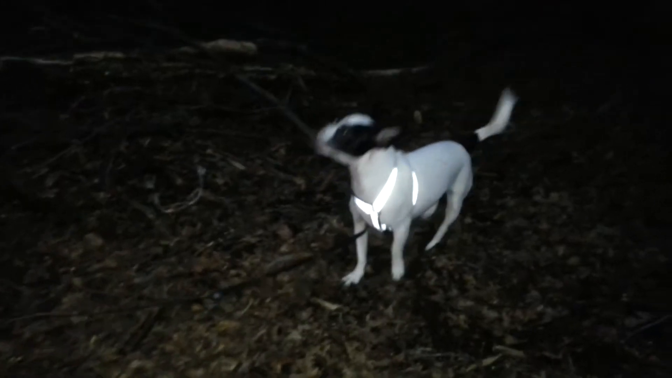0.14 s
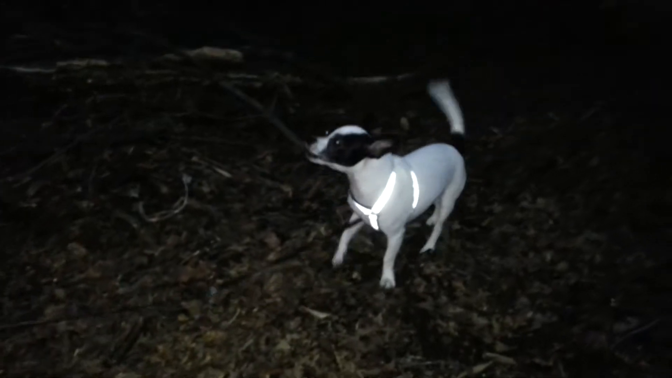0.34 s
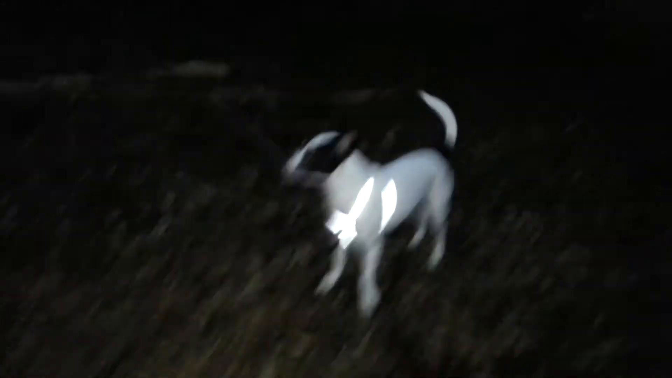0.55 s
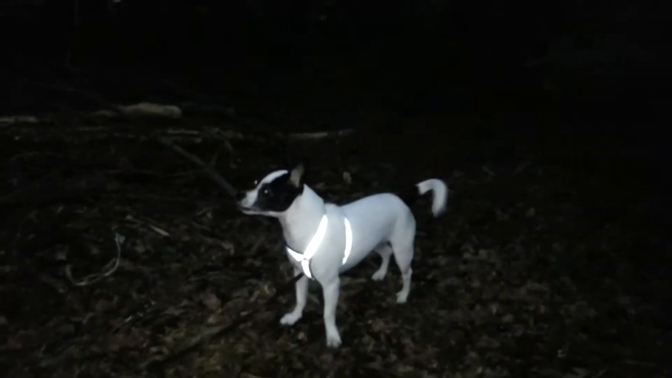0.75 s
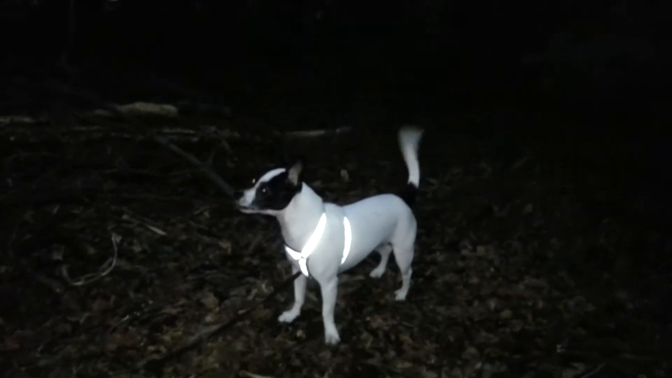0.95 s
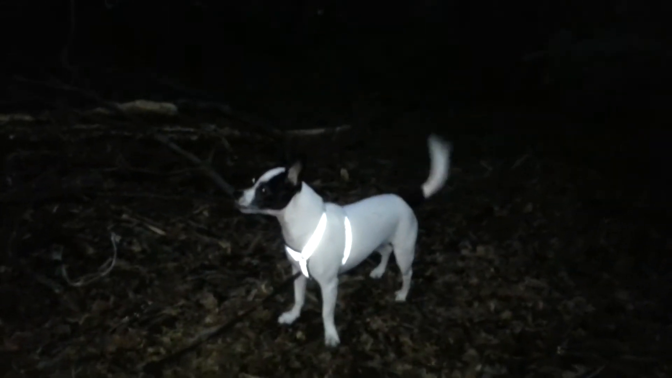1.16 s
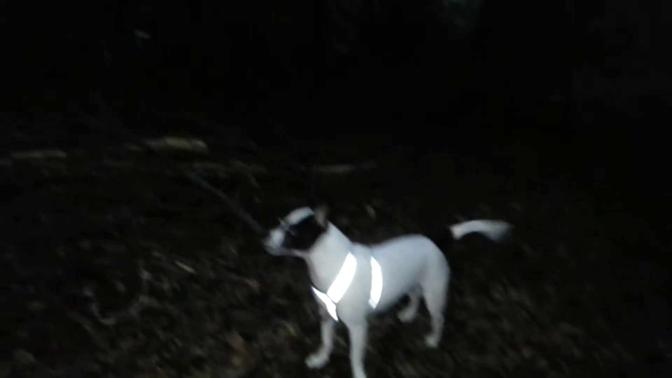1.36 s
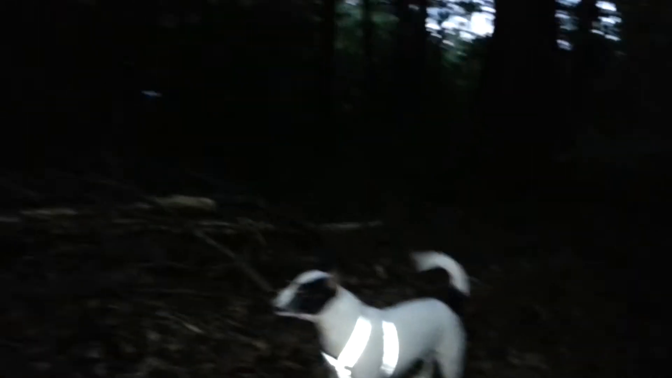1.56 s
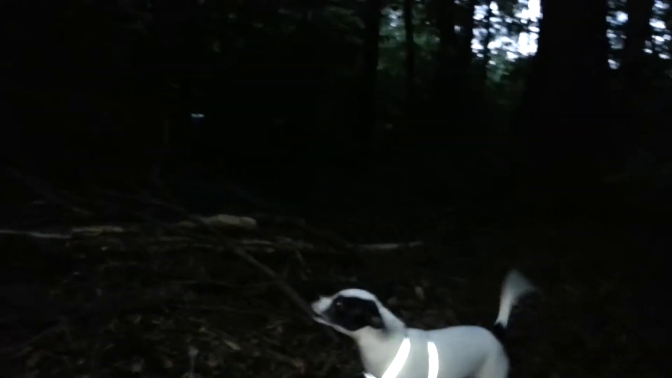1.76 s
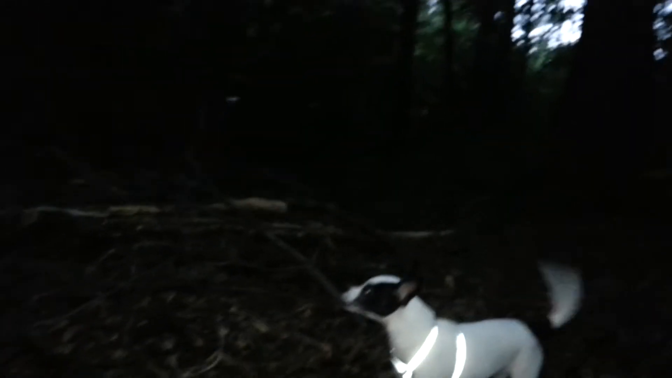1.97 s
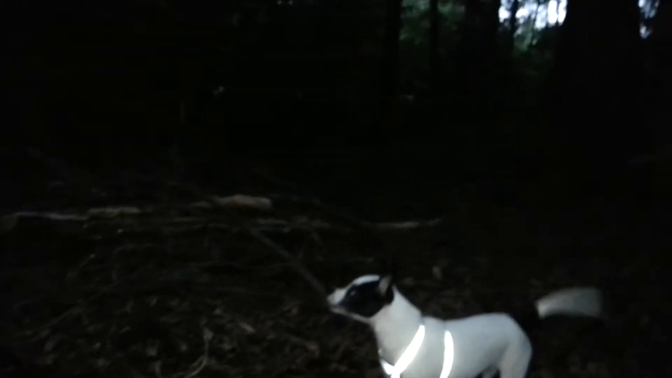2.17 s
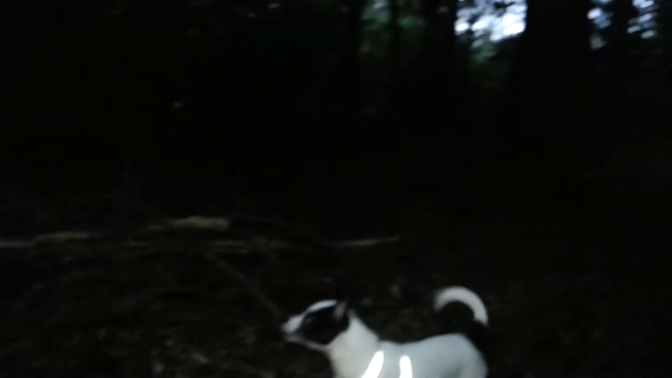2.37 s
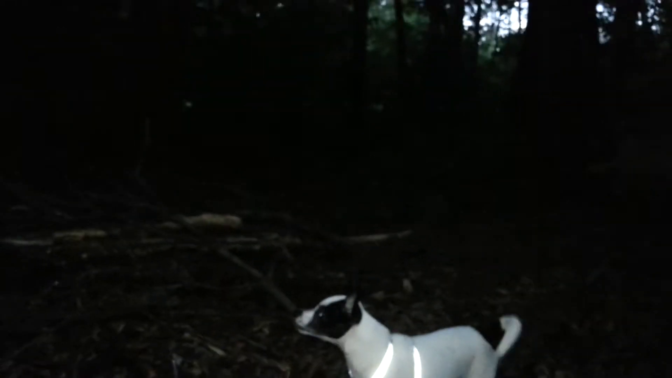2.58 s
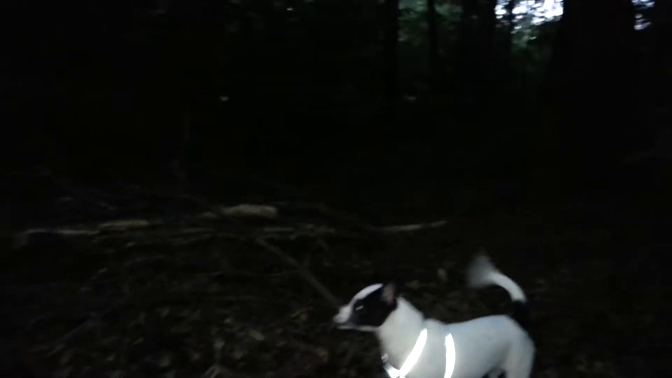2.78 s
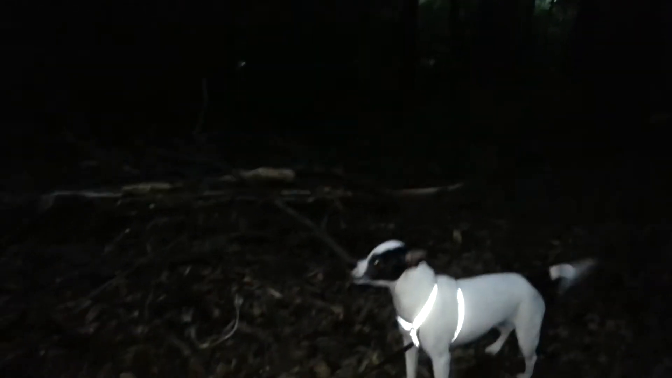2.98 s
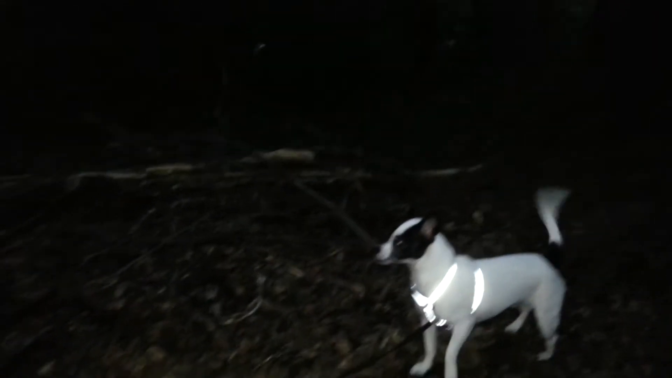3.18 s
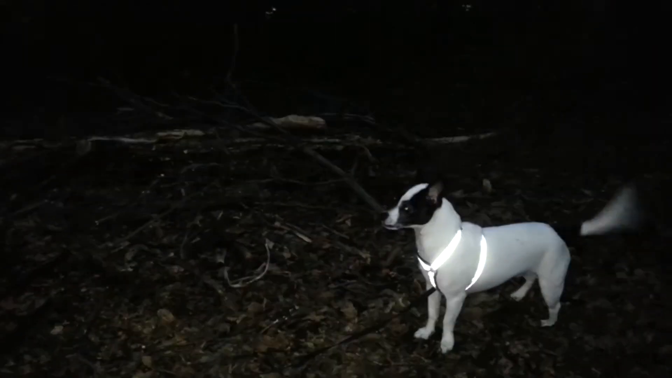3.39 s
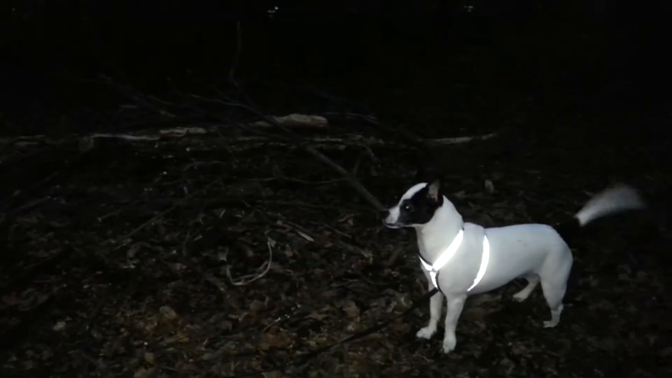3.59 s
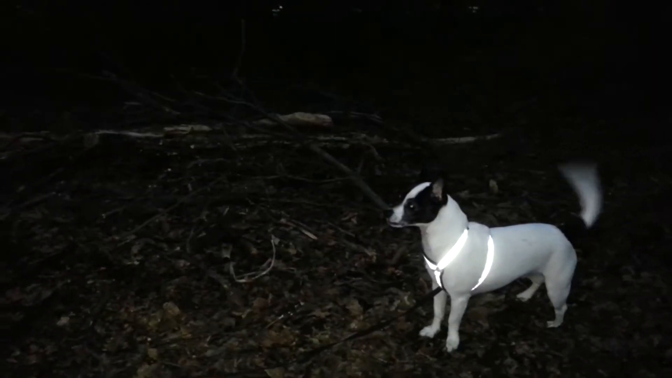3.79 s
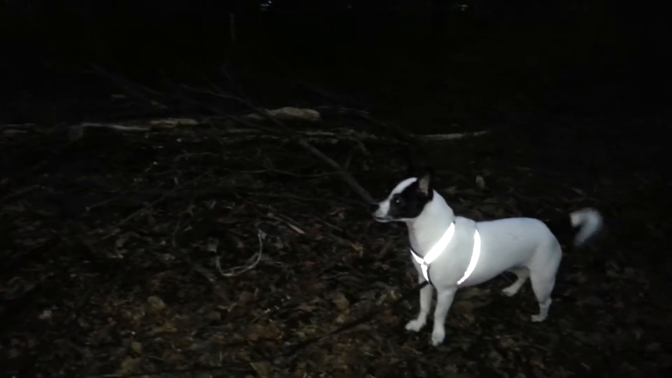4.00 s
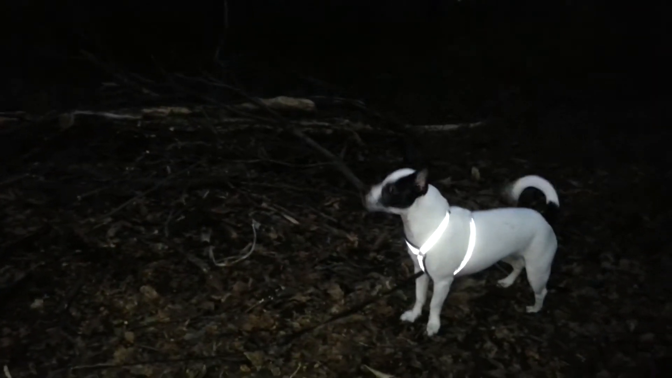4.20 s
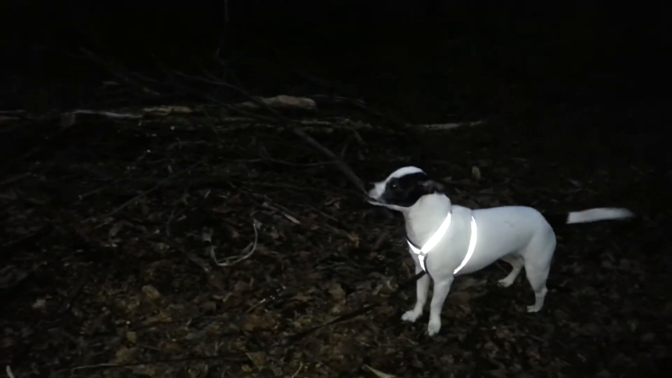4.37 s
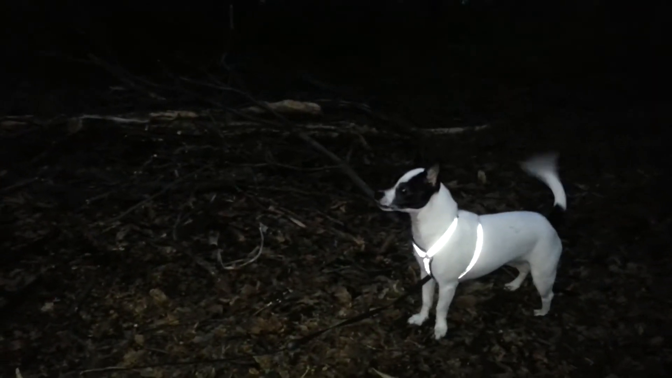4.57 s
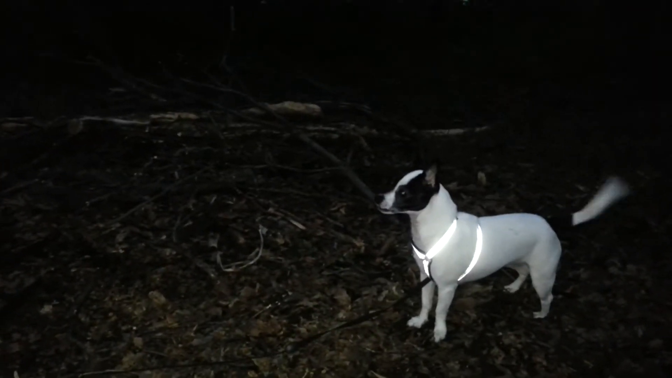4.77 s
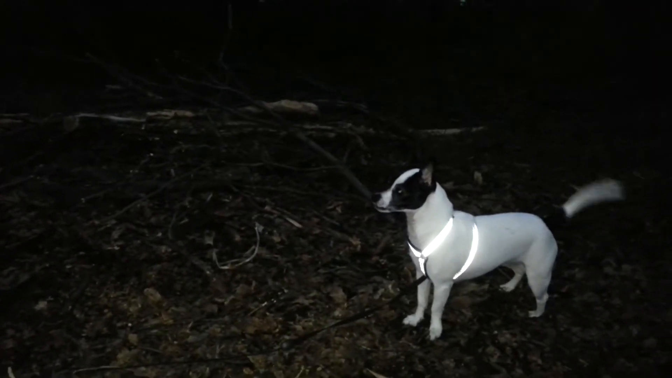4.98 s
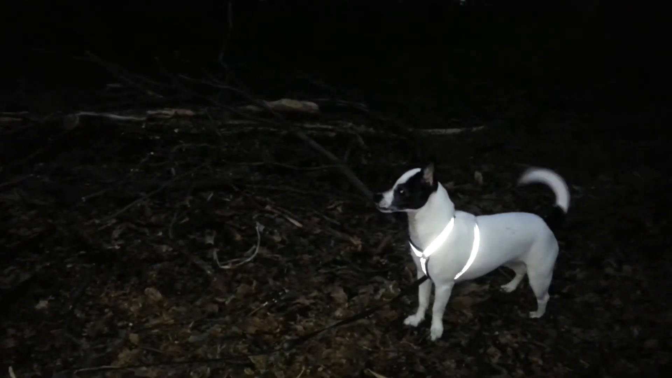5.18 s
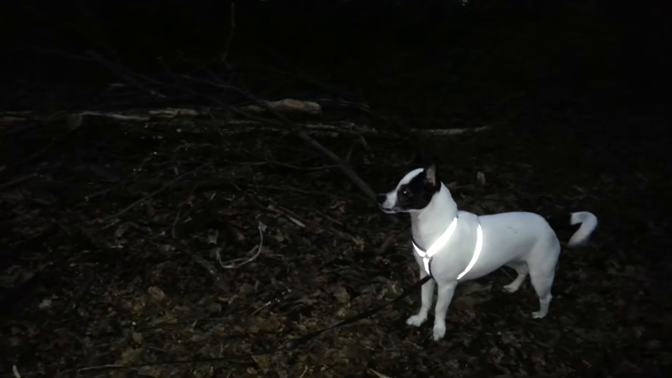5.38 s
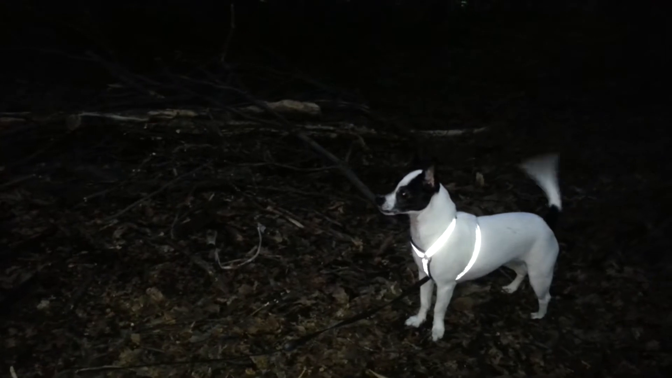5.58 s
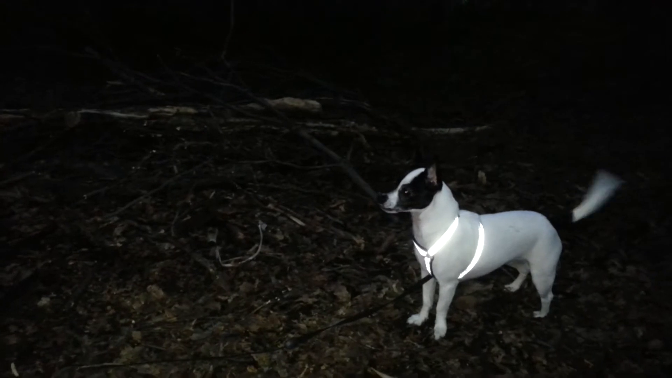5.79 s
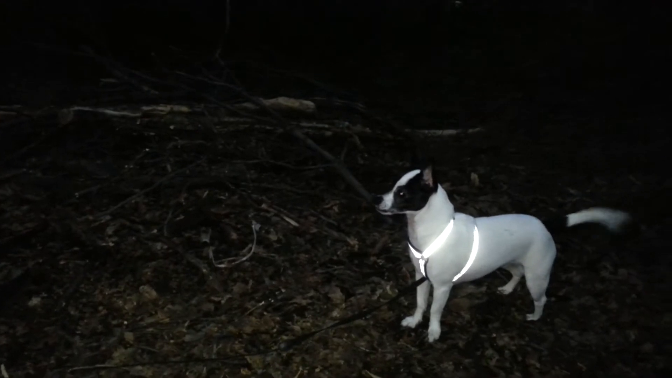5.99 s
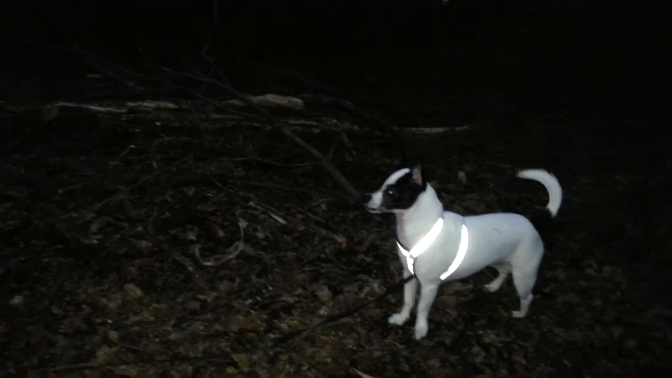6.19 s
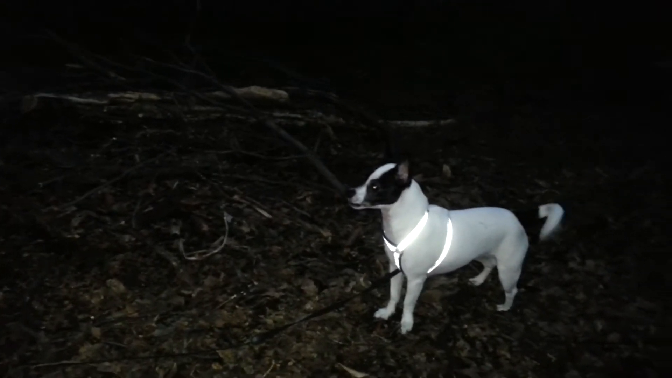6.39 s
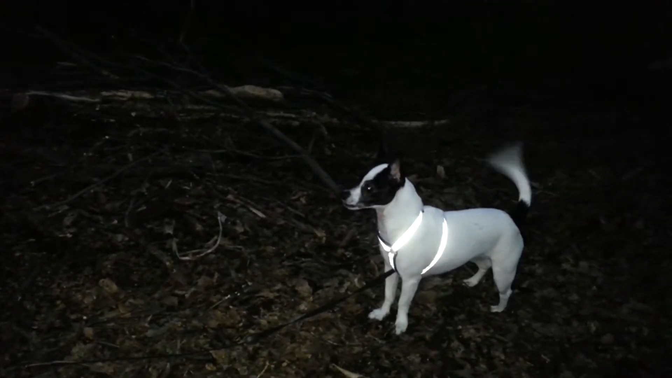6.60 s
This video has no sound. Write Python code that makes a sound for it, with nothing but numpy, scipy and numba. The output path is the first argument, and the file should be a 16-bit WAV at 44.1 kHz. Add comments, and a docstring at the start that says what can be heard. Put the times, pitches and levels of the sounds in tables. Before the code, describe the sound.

A small dog growls close by in quiet woods at night, in quick fluttering throbs that flare into a brief snarl at about 0.4 seconds and fade by 1.5. At 1.6 seconds it gives a loud, sharp, rough bark. A softer, lower bark comes at 3 seconds, followed by quieter broken growling, then another loud bark at 4.2. The two loud barks slightly overload the microphone and ring on among the trees. A distant dog answers with faint, echoing yelps, clearest around 3.7, 6.3 and 6.5 seconds. Drips tick irregularly on dry leaves throughout, with the sharpest one a little to the left at about 6.2 seconds. Leaves rustle softly near the start and again around 3 seconds. Underneath, the night air makes a faint, steady hiss.

```python
"""In a wood at night, a small dog close by growls in fluttering throbs and barks three times.
Its vocal folds chop the breath into pulses, which ring in its mouth or hum through its nose.
The two loud barks overload the microphones and ring on among the trunks.
Another dog answers far away, drips tick on dry leaves, the leaves rustle and the air hisses faintly."""
import sys
import numpy as np
from scipy import signal
from scipy.fft import rfft, irfft, next_fast_len
from scipy.io import wavfile
from scipy.ndimage import uniform_filter1d
from numba import njit

SR = 44100
rng = np.random.default_rng(int(sys.argv[2]) if len(sys.argv) > 2 else 0)


def dump(signal):
    """Clip the signal to [-1, 1] and save it as 16-bit WAV at the path in sys.argv[1]."""
    limited = np.clip(np.atleast_2d(signal).T, -1, 1)
    pcm = np.round(limited * 32767).astype(np.int16)
    wavfile.write(sys.argv[1], SR, pcm)


N = 293265

# The three barks. Each row: start in seconds, seconds until the voice breaks and until the mouth closes,
# clean and broken pitch in Hz, ring of the open jaw in Hz, ring of the tongue before and after the
# break in Hz, extra push at the break in dB, loudest chest hum in dB.
BARKS = [(1.597, .047, .154, 308.4, 468, 920.6, 1549, 1539, 4.5, -46),
         (2.953, .056, .092, 183.4, 232.4, 808, 1289, 1498, 0, -38.5),
         (4.207, .058, .114, 264, 397.7, 764, 1472, 1543, 5, -46)]
# How each bark swells and fades, one list per bark.
# Each row: time in seconds, level of the jaw's ring in dB, level of the higher rings in dB.
BARK_LEVELS = [
    [(1.597, -23, -38), (1.603, -16, -16.5), (1.619, -2.5, -9), (1.687, -7.5, -3.5), (1.695, -0.5, -11.5),
     (1.727, -10.5, -7.5), (1.751, -5.5, -20), (1.765, -20, -25), (1.795, -24, -25.5)],
    [(2.952, -30, -49.5), (2.958, -21, -35.5), (2.966, -18.5, -30), (2.982, -23.5, -24),
     (3.002, -13.5, -14.5), (3.01, -19.5, -30.5), (3.036, -23.5, -33.5), (3.065, -42.5, -50.5)],
    [(4.207, -29.5, -54.5), (4.233, -6.5, -19), (4.249, -3, -12), (4.281, -11.5, -8.5), (4.301, -10.5, -4),
     (4.321, -10.5, -24.5), (4.329, -13.5, -31.5), (4.345, -31, -35.5)],
]

def barks(break_blend_s=.0033, push_s=.028, hum_s=.085, release_db_per_s=598.5,
          half_open_hz=690, closing_hz_per_s=450, clean_rough=.087, hoarse_rough=.4, broken_rough=.76):
    """The vocal folds beat cleanly, break into chaos at full effort, and run down in a low hum."""
    out = np.zeros(N)
    for bark, levels in zip(BARKS, BARK_LEVELS):
        start, break_s, close_s, clean_hz, broken_hz = bark[:5]
        open_hz, tongue_from_hz, tongue_to_hz, push_db, chest_db = bark[5:]
        age = np.arange(int((close_s + hum_s) * SR)) / SR
        since_break = age - break_s
        broken = (1 + np.tanh(since_break / break_blend_s)) / 2  # 0 before the break, 1 after
        effort_db = push_db * np.exp(-(since_break / push_s) ** 2)
        release_db = release_db_per_s * np.maximum(start + age - levels[-1][0], 0)
        jaw_db, upper_db = curves(levels, start + age) + (effort_db - release_db)
        voice_db = np.maximum(jaw_db, upper_db)
        pitch = bark_pitch(age, break_s, close_s, clean_hz, broken_hz, broken)
        # roughness runs from 0 to 1; the broken voice is roughest where it is brightest
        chaos = broken * np.interp(upper_db - jaw_db, [-12, 0], [broken_rough / 2, broken_rough])
        hoarse = hoarse_rough * (voice_db < -9)  # pushed too softly to beat cleanly
        rough = np.maximum(chaos, hoarse) * (age < close_s)
        flow = vocal_folds(pitch, np.maximum(rough, clean_rough))
        # the mouth opens wide as the voice breaks
        jaw_hz = half_open_hz + (open_hz - half_open_hz - closing_hz_per_s * since_break) * broken
        tongue_hz = tongue_from_hz + (tongue_to_hz - tongue_from_hz) * broken
        jaw, upper = mouth(flow, jaw_hz, tongue_hz, damping=.85)
        voice = amp(jaw_db) * levelled(jaw, span_s=.006)
        voice += amp(upper_db - 1) * levelled(upper, span_s=.0075)
        # the chest gives off the lowest tone, even as the mouth closes
        hum = cut_bass(resonate(np.diff(flow, prepend=0), pitch, width_hz=110.), hz=130, order=4)
        chest = amp(np.minimum(chest_db, voice_db - 9)) * levelled(hum, span_s=.013)
        add(out, start, (voice + chest + breath(age, voice_db)) * signal.windows.tukey(len(age), .03))
    return out


def bark_pitch(age, break_s, close_s, clean_hz, broken_hz, broken,
               scoop=.2, scoop_s=.009, climb_hz_per_s=1620, sag_hz_per_s=420, run_down_s=.07):
    """The pitch slides in from below, climbs until the break, sags, and drops once the mouth closes."""
    climbing = (clean_hz + climb_hz_per_s * age) * (1 - scoop * np.exp(-age / scoop_s))
    sagging = broken_hz - sag_hz_per_s * (age - break_s)
    run_down = np.exp(-np.maximum(age - close_s, 0) / run_down_s)
    return ((1 - broken) * climbing + broken * sagging) * run_down


def vocal_folds(pitch, rough, jitter=.2, scatter_db=5):
    """Each beat of the folds lets out a pulse and a puff of air; a rough voice beats unevenly."""
    n, cycles = len(pitch), np.cumsum(pitch) / SR
    beats = np.flatnonzero(np.diff(np.floor(cycles), prepend=-1))
    late, size = rng.standard_normal((len(beats), 2)).T
    at = np.clip(beats + jitter * rough[beats] * late * SR / pitch[beats], 0, n - 1).astype(int)
    pulses = np.bincount(at, amp(scatter_db * rough[beats] * size), n)
    puffs = unit(rng.standard_normal(n) * (1 + np.cos(2 * np.pi * cycles)))
    return unit(pulses) + rough * puffs


# The mouth's four rings (resonances), low to high. Each row: width in Hz before damping, level in dB.
MOUTH_RINGS = [(213, 4), (300, -4.5), (246.2, -10.5), (450, -39.5)]

def mouth(flow, jaw_hz, tongue_hz, damping):
    """Air rings in the open mouth. Returns the jaw's ring and the sum of the three higher ones."""
    centres = [jaw_hz, tongue_hz, 1.46 * tongue_hz, np.full(len(flow), 4100.)]
    jaw, *upper = [amp(db) * resonate(flow, hz, width * damping)
                   for hz, (width, db) in zip(centres, MOUTH_RINGS)]
    return cut_bass([jaw, sum(upper)], hz=230, order=2)  # a small mouth gives off no bass


# The tone of a bark's breath. Each row: frequency in Hz, level in dB.
BREATH_TONE = [(2000, -20.5), (3200, -7.5), (4300, 0), (6500, -1.5), (8500, 1), (12000, -9.5),
               (15000, -19.5)]

def breath(age, voice_db, lag_s=.012, below_voice_db=28, limit_db=-49):
    """Air rushes past the teeth, trailing the voice a little."""
    rush_db = np.minimum(limit_db, np.interp(age - lag_s, age, voice_db) - below_voice_db)
    return amp(rush_db) * unit(coloured(rng.standard_normal(len(age)), BREATH_TONE))


# How hard the dog growls. Each row: time in seconds, pulses per second, level through the nose in dB.
GROWL_EFFORT = [(0, 158.4, -23.5), (.07, 174, -16.5), (.29, 117.7, -27), (.39, 174.5, -15.5),
                (.55, 145.3, -21), (.7, 138.9, -25.5), (1.35, 137.4, -28.5), (1.52, 115.7, -31),
                (3.1, 91.6, -41.5), (3.25, 100.3, -34.5), (3.52, 116.2, -33.5), (3.83, 114.8, -32.5),
                (4.12, 107, -34)]
# The opening snarl. Each row: time in seconds, level through the lips in dB, ring of the jaw in Hz.
SNARL = [(0, -20, 735), (.14, -26.5, 710), (.27, -26, 665), (.345, -15, 660), (.372, -14.5, 678.7),
         (.388, -7, 706), (.407, -20, 698), (.44, -21.5, 690), (.48, -57.5, 700)]
# The tone of the closed muzzle. Each row: frequency in Hz, level in dB.
NOSE_TONE = [(60, -52), (105, -20.5), (140, -9), (280, -1.5), (350, -1), (425, 6.5), (490, 2), (560, -0.5),
             (720, 2), (850, 4.5), (1080, 4), (1260, -26), (1500, -21), (2500, -37), (5000, -78.5)]

def growl(scatter_db=1, jitter_s=.00019, sag_db=3, rasp=.44):
    """Slow pulses come in throbs, through bared lips and nose at first, then through the nose."""
    nose, lips = np.zeros(N), np.zeros(N)
    for start, length in throbs():
        rate = curves(GROWL_EFFORT, start)[0]
        beat = np.arange(max(round(length * rate), 1))
        late, size = rng.standard_normal((len(beat), 2)).T
        times = start + beat / rate + jitter_s * late
        nose_db, lips_db = curves(GROWL_EFFORT, times)[1], curves(SNARL, times)[0]
        at = np.clip(times * SR, 0, N - 1).astype(int)
        # behind a closed mouth the folds need one beat to get going
        soft_start_db = -3 * (beat == 0) * (len(beat) > 2)
        nose[at] = amp(nose_db + scatter_db * size + soft_start_db)
        # an open mouth lets the pressure sag
        lips[at] = amp(lips_db + scatter_db * size - sag_db * np.minimum(beat, 2))
    # each pulse drags a little rushing air with it
    nose += rasp * np.sqrt(np.abs(uniform_filter1d(nose ** 2, size=300))) * rng.standard_normal(N)
    jaw_hz = curves(SNARL, np.arange(N) / SR)[1]
    through_lips = lambda x, hz: amp([0, -9]) @ mouth(x, hz, 1.85 * hz, damping=.55)
    pulse = signal.unit_impulse(SR // 10, 'mid')  # one pulse sets the scale of both paths
    snarl = through_lips(lips, jaw_hz) / through_lips(pulse, jaw_hz[:len(pulse)]).max()
    muffled = coloured(nose, NOSE_TONE) / coloured(pulse, NOSE_TONE).max()
    return amp(3) * snarl - muffled


# Bouts of growling. Each row: start in seconds, number of throbs, throbs per second,
# share of each throb that sounds.
GROWL_BOUTS = [(-.001, 10, 29, .55), (.341, 1, 29, .65), (.369, 2, 24, .9), (.457, 7, 22.8, .58),
               (.760, 7, 24.3, .62), (1.044, 8, 23.1, .65), (1.390, 4, 25.3, .48), (3.155, 2, 13.7, .78),
               (3.305, 3, 21.5, .62), (3.502, 3, 9.6, .9), (3.817, 4, 25.6, .55), (3.978, 5, 28.4, .25)]

def throbs():
    """Each bout flutters at its own steady rate. Returns every throb's start and length in seconds."""
    return [(start + k / rate, share / rate)
            for start, count, rate, share in GROWL_BOUTS for k in range(round(count))]


# The far dog's yelps. Each row: start in seconds, length in seconds, pitch in Hz, level in dB,
# step in dB from one harmonic (a multiple of the pitch) to the next.
FAR_YELPS = [(3.415, 0.13, 610, -65.5, 4.5), (3.626, 0.072, 491, -57.5, 1), (3.672, .12, 555, -39, -15.5),
             (4.454, .083, 584.4, -57, -14), (5.44, 0.11, 450, -55.5, -20), (5.666, 0.14, 588.6, -55, -4.5),
             (6.268, 0.029, 481, -50.5, -1.5), (6.295, .1, 558.8, -42.5, -11.5),
             (6.501, 0.091, 575, -48.5, -8)]

def far_dog(scoop=.055, scoop_share=.22, waver=.035):
    """Each hoarse yelp slides up to its pitch; distance leaves only three harmonics."""
    out = np.zeros(N)
    for start, length, hz, db, step_db in FAR_YELPS:
        progress = np.linspace(0, 1, int(length * SR))
        unsteady = 1 + waver * np.interp(progress, np.linspace(0, 1, 20), rng.standard_normal(20))
        pitch = hz * (1 - scoop * np.exp(-(progress / scoop_share) ** 2)) * unsteady
        phase = 2 * np.pi * np.cumsum(pitch) / SR
        tone = sum(amp(db + k * step_db) * np.sin((k + 1) * phase) for k in range(3))
        add(out, start, tone * signal.windows.tukey(len(tone), .6))
    return out


# The heavier drips. Each row: time in seconds, level in dB, share of leaf body in dB (capped at 0),
# lean to the left (negative is right).
HEAVY_DRIPS = [(0.1055, -31.5, -23, 1.0), (0.4697, -29, -23, -0.5), (0.5322, -16, -17, 4),
               (0.6134, -30, 26, 2.5), (0.7506, -37, -15, -0.5), (1.2825, -39, -0.5, 1.0),
               (1.3181, -23.5, -17, 1), (1.925, -26.5, -12, 3.5), (2.9231, -36, -21, -6),
               (3.1712, -19, -19.5, -1.5), (3.2151, -30, -21, -1), (3.3277, -31.5, -16.5, -0.5),
               (3.5018, -33.5, -16, 2), (3.5326, -33, -18.5, -1), (4.8752, -29, -20.5, -2.5),
               (4.9585, -26, -9.5, 1), (5.6065, -17, -14.5, 0), (5.671, -31, -31.5, 1.5),
               (5.7581, -25.5, -5, 2.5), (5.8027, -30, 4.5, 3), (5.9504, -26, -5.5, 0.5),
               (6.128, -28.5, -19.5, -2), (6.2163, -1.5, -13, 7)]
# The tones of a drip's leafy body, sharp edge and low thud. Each row: frequency in Hz, level in dB.
LEAF_TONE = [(100, -60), (600, -35), (1200, -13.5), (1700, 1.5), (2300, 3), (3000, -10), (4200, 0.5),
             (5200, -13), (9000, -37)]
SNAP_TONE = [(100, -59.5), (1500, -31.5), (3500, -7), (5800, -7.5), (8000, -5), (11000, -4.5),
             (14000, -7.5), (16000, -23.5)]
THUD_TONE = [(90, -58), (240, -14.5), (500, 0.5), (1000, -11), (2000, -24.5), (5000, -61)]

def drips(crack_s=.0015, crack_top_hz=14200, grit_s=.0033, rattle_s=.05, left_lag_s=.00036, spread=.24):
    """Each drip cracks on a leaf, which rattles briefly; heavy ones thud. The right side hears it first."""
    out, t = np.zeros((2, N)), np.arange(SR // 20) / SR
    remaining = np.clip(1 - t / crack_s, 0, 1)
    crack = np.sin(np.pi * crack_top_hz * crack_s * remaining ** 2)  # crosses the leaf treble first
    fade = amp(-1 - 60 * t / grit_s) + amp(-16 - 60 * t / rattle_s)
    for time, db, body_db, lean in [*HEAVY_DRIPS, *light_drips()]:
        burst = np.pad(crack + rng.standard_normal(len(t)) * fade, (64, 0))
        body = amp(9.5 + min(body_db, 0)) * coloured(burst, LEAF_TONE)
        thud = amp(db / 2 - 7) * coloured(burst, THUD_TONE)
        tick = coloured(burst, SNAP_TONE) + body + thud
        tick *= amp(db + 2) / np.abs(tick).max()
        start = time - .0005
        add(out[0], start + left_lag_s, tick * amp(spread * lean))
        add(out[1], start, tick * amp(-spread * lean))
    return out


def light_drips(per_s=1.5, level_db=-42, range_db=10, body_db=-11):
    """Light drips fall at random moments. Returns rows like those of the heavier ones."""
    draws = rng.random((round(per_s * N / SR), 2))
    return [(when * N / SR, level_db + range_db * (size - .5), body_db, 0) for when, size in draws]


# How long the wood rings. Each row: frequency in Hz, seconds to fade by 60 dB.
ECHO_FADE = [(150, .5), (500, 0.36), (1000, 1.8), (2200, 1.1), (4000, .6), (10000, 0.72)]
# The tone of the echo. Each row: frequency in Hz, level in dB.
ECHO_TONE = [(100, -13), (450, -15.5), (800, -9.5), (1150, 1), (1550, -9.5), (1950, -1), (2400, -2.5),
             (4000, 10), (12000, 4)]

def wood_echo(x, near_db=3, near_fade_s=.61, rise_s=.0029, width=.44):
    """Near trunks scatter a quick answer, far ones a long tail."""
    hz, t, noise = signal.stft(rng.standard_normal((2, SR * 3 // 2)), SR, nperseg=256)
    fade = amp(-60 * t / along(ECHO_FADE, hz)[:, None]) + amp(near_db - 60 * t / near_fade_s)
    rise = 1 - np.exp(-t / rise_s)
    mid, side = signal.istft(noise * fade * rise, SR, nperseg=256)[1]
    tail = np.array([mid + width * side, mid - width * side])
    tail = coloured(tail / np.linalg.norm(tail[0]), ECHO_TONE)
    return signal.fftconvolve(x[None], tail, axes=1)[:, :N]


# Scuffs in the leaves. Each row: time in seconds, level in dB.
SCUFFS = [(0, -46), (.5, -50.5), (1.302, -55.5), (3.05, -53), (3.5, -57.5)]
# The tone of dry leaves. Each row: frequency in Hz, level in dB.
RUSTLE_TONE = [(1000, -13), (2200, 4), (4500, -2.5), (6500, -4.5), (8500, -5), (13000, -10), (15500, -18.5)]

def rustle(crackles_per_s=1200, crackle_s=.0011, scatter_db=3, rise_s=.049, settle_db_per_s=16):
    """Dry leaves crackle at each scuff, then settle."""
    t = np.arange(N) / SR
    swells = [amp(db - settle_db_per_s * np.maximum(t - s, 0)) * np.clip(1 + (t - s) / rise_s, 0, 1)
              for s, db in SCUFFS]
    hits = rng.random(N) < crackles_per_s / SR
    sizes = amp(scatter_db * np.minimum(rng.exponential(size=N), 4))
    crackles = signal.lfilter([1], [1, -np.exp(-1 / (crackle_s * SR))], hits * sizes)
    return np.max(swells, axis=0) * unit(coloured(crackles * rng.standard_normal((2, N)), RUSTLE_TONE))


# The tone of the night air. Each row: frequency in Hz, level in dB.
AIR_TONE = [(25, -38), (60, -25), (110, -10), (200, -12), (420, -6), (700, -7.5), (1100, -11.5),
            (1700, -18.5), (2400, -13), (3400, -21.5), (4200, -16), (6200, -24), (9000, -23),
            (14000, -25.5), (15600, -43)]
# How alike left and right are. Each row: frequency in Hz, likeness (1 is the same, 0 or less unrelated).
AIR_LIKENESS = [(60, 0.62), (180, 0.093), (550, 0.016), (1650, -0.095), (4970, -0.47), (15000, -0.14)]

def night_air(level_db=-53, hiss_hz=4800, hiss_half_width_hz=300, hiss_db=-61):
    """The air makes a faint, wide hush, with a narrow band of high hiss."""
    def mid_and_side(hz):
        angle = np.arccos(np.clip(along(AIR_LIKENESS, hz), 0, 1)) / 2
        return amp(along(AIR_TONE, hz)) * [np.cos(angle), np.sin(angle)]
    mid, side = filtered(rng.standard_normal((2, N)), mid_and_side)
    band = lambda hz: 1 / (1 + ((hz - hiss_hz) / hiss_half_width_hz) ** 2)
    hiss = filtered(rng.standard_normal((2, N)), band)
    return amp(level_db) * unit(np.array([mid + side, mid - side])) + amp(hiss_db) * unit(hiss)


def amp(db):
    """Turn decibels into a gain."""
    return 10 ** (np.asarray(db) / 20)


def unit(x):
    """Scale x to an average power of 1."""
    return x / np.sqrt(np.mean(x ** 2) + 1e-20)


def levelled(x, span_s):
    """Hold the power of x near 1, averaged over span_s seconds."""
    size = max(int(span_s * SR), 8)
    power = uniform_filter1d(uniform_filter1d(x ** 2, size), size)
    return x / np.sqrt(np.abs(power) + 1e-4 * np.mean(x ** 2))


def along(points, hz):
    """Read a table of frequencies and values at hz, with octaves evenly spaced."""
    known_hz, values = np.transpose(points)
    return np.interp(np.log(hz + 1), np.log(known_hz + 1), values)


def curves(rows, t):
    """Read every column after the time at the times t."""
    times, *columns = np.transpose(rows)
    return [np.interp(t, times, column) for column in columns]


def filtered(x, response):
    """Scale each frequency in x by response(hz)."""
    n = x.shape[-1]
    padded = next_fast_len(n + 8192)
    return irfft(rfft(x, padded) * response(np.fft.rfftfreq(padded, 1 / SR)), padded)[..., :n]


def coloured(x, tone):
    """Shape x with a tone table."""
    return filtered(x, lambda hz: amp(along(tone, hz)))


def cut_bass(x, hz, order):
    """Weaken everything below hz."""
    return signal.sosfilt(signal.butter(order, hz, 'high', fs=SR, output='sos'), x)


@njit
def resonate(x, hz, width_hz):
    """Make x ring at a moving frequency, through two equal stages."""
    y, first, second = np.zeros(len(x)), 0j, 0j
    loss = np.pi * width_hz / SR
    for i in range(len(x)):
        turn = np.exp(-loss + 2j * np.pi * hz[i] / SR)
        first = first * turn + loss * x[i]
        second = second * turn + loss * first
        y[i] = 2 * second.imag
    return y


def add(track, start_s, x):
    """Mix x into the track from start_s on."""
    part = track[..., max(round(start_s * SR), 0):][..., :x.shape[-1]]
    part += x[..., :part.shape[-1]]


# The near dog's balance between the microphones. Each row: frequency in Hz, left minus right in dB.
DOG_BALANCE = [(100, -2.5), (400, 2.5), (700, -3.5), (950, 2), (1400, 10), (2400, 6.5), (5000, 2.5)]

def scene():
    """Both dogs and the drips echo in the same wood, over the air and the leaves."""
    dog, far, ticks = barks() + growl(), far_dog(), drips()
    near = filtered(dog, lambda hz: amp(np.outer([.5, -.5], along(DOG_BALANCE, hz))))
    echoes = amp(-17.5) * wood_echo(dog) + amp(10.5) * wood_echo(far) + amp(-27) * wood_echo(ticks[1])
    return near + amp(2) * far + ticks + echoes + night_air() + rustle()


def record(dry, ceiling=.97, hardness=12, top_hz=15600):
    """The microphones overload and flatten the loudest peaks; the highest treble is cut off."""
    clipped = dry / (1 + np.abs(dry / ceiling) ** hardness) ** (1 / hardness)
    return filtered(clipped, lambda hz: hz < top_hz)


dry = scene()
out = record(dry)
dump(out)
```